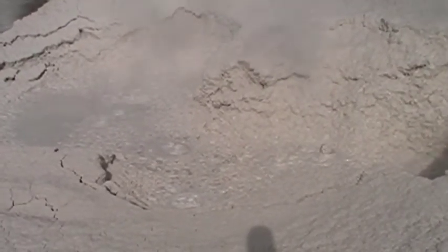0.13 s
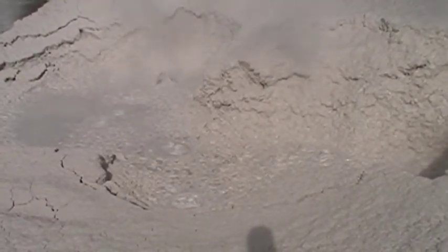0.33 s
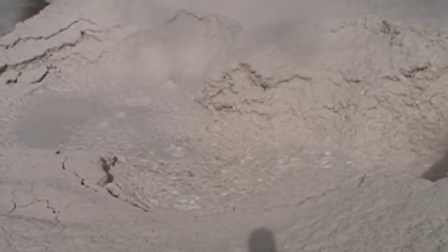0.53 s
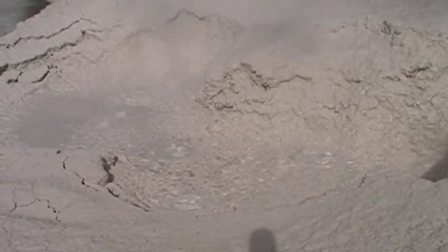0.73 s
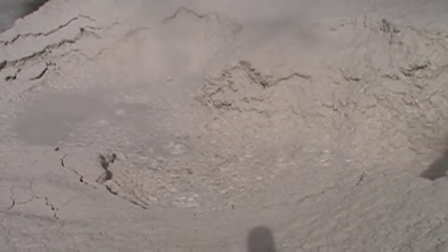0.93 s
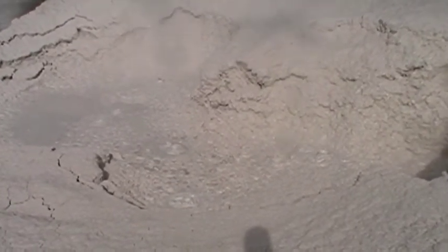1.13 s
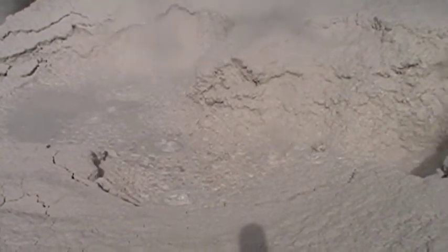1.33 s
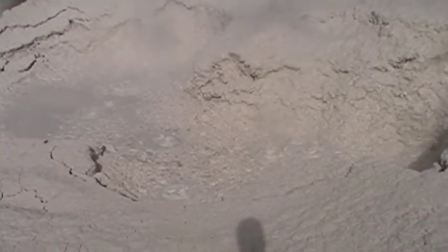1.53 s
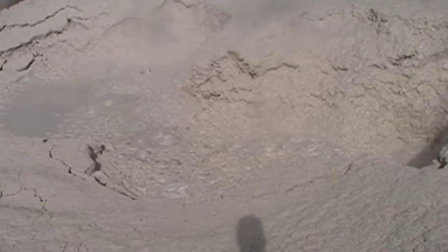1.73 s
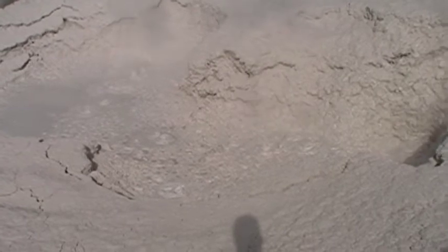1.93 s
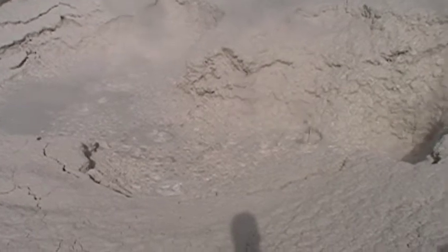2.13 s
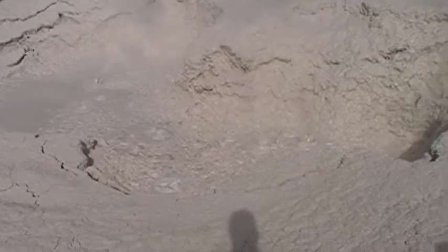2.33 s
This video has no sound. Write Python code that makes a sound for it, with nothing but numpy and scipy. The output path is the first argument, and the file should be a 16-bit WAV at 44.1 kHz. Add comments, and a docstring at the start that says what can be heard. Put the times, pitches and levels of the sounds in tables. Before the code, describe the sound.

Thick mud boils over soft steam hiss and fine wet crackle. Near 0.24 s a loud hollow gulp rises in pitch, followed by a strong pop, snaps, squelch and spatter. Lighter plops come at 0.6 and 0.9-1.3 s, a second deep gulp at 1.5, busier bursts from 1.7, and a hard wet pop at 2.04. Faint high chirps recur; a tiny bird whistle rises near 2.27, under a barely audible steady high tone.

```python
"""Throughout: steam haze (shaped noise), mud simmer (tiny damped rings), a very faint high tone, and from
0.03 s runs of far chirps falling near 6 kHz. At 0.24 s the loudest gulp, a gas pocket ringing with rising pitch,
then a strong pop, film snaps, slap-driven squelches and flung spatter; lighter bursts near 0.6-0.7 and 0.9-1.3 s.
At 1.5 s a second big gulp, more bursts from 1.7 s, a strong pop at 2.04 s; a far bird whistles upward at 2.27 s.
The mud pot boils in a shallow open crater, whose walls answer briefly."""
import sys
import numpy as np
from scipy import signal
from scipy.fft import rfft, irfft, next_fast_len
from scipy.io import wavfile
from scipy.ndimage import map_coordinates

SR = 44100
rng = np.random.default_rng(int(sys.argv[2]) if len(sys.argv) > 2 else 0)


def int16_out(signal):
    """Quantize to a 16-bit WAV file."""
    q = np.round(np.clip(np.atleast_2d(signal).T, -1, 1) * 32767)
    wavfile.write(sys.argv[1], SR, q.astype(np.int16))


N = 108045
EVENT_T_S = np.arange(SR // 5) / SR  # time within one event


def amp(db):
    """Decibels to gain."""
    return 10 ** (np.asarray(db) / 20)


def unit(x):
    """Scale to rms 1."""
    return x / np.sqrt(np.mean(x ** 2) + 1e-20)


def along(points, hz):
    """Interpolate (f/Hz, value) points on a log frequency axis."""
    f, value = np.transpose(points)
    return np.interp(np.log(hz + 1), np.log(f + 1), value)


def filtered(x, response):
    """Zero-phase filter: spectrum times a gain function of frequency."""
    n = x.shape[-1]
    padded = next_fast_len(n + 8192)
    gain = response(np.fft.rfftfreq(padded, 1 / SR))
    return irfft(rfft(x, padded) * gain, padded)[..., :n]


def coloured(x, points):
    """Filter x by a (f/Hz, level/dB) colour."""
    return filtered(x, lambda hz: amp(along(points, hz)))


def wobble(knots_per_s, count=N):
    """Smooth random curve through normally distributed knots."""
    knots = rng.standard_normal(256)
    return map_coordinates(knots, [np.arange(count) * knots_per_s / SR], mode="mirror")


def add(track, start_s, sound):
    """Mix a sound into the track from start_s."""
    i = int(np.clip(round(start_s * SR), 0, N - 1))
    track[i:i + len(sound)] += sound[:N - i]


def swell(peak_s, shape):
    """Envelope reaching 1 at peak_s, then dying away; higher shape = more compact."""
    u = EVENT_T_S / peak_s
    return (u * np.exp(1 - u)) ** shape


def glide(middle_s, hz, slope_hz_per_s, width_s):
    """Sliding sine under a Gaussian envelope; hz is the pitch at the middle."""
    t = np.arange(N) / SR - middle_s
    turns = hz * t + slope_hz_per_s * t * t / 2
    return np.exp(-(t / width_s) ** 2) * np.sin(2 * np.pi * turns)


def droplets(per_s, hz, spread, cycles, uneven_db):
    """Stream of tiny damped rings, random in time, pitch (log-normal), size and sign; rms 1."""
    when, size, sign = rng.random((3, 8000))[:, :int(per_s * N / SR)]
    pitch = hz * np.exp(spread * rng.standard_normal(8000)[:len(when)])
    pitch = np.clip(pitch, 150, 15000)[:, None]
    k = np.arange(400)  # samples in one ring
    turns = pitch * k / SR
    gain = np.sign(sign - .5) * amp(-uneven_db * np.log(np.maximum(size, .02)))
    rings = gain[:, None] * np.sqrt(pitch) * np.sin(2 * np.pi * turns) * np.exp(-turns / cycles)
    index = (when * N).astype(int)[:, None] + k
    return unit(np.bincount(index.ravel(), rings.ravel(), N)[:N])


FLUTTER_KNOTS_PER_S, FLUTTER = 400, 0.093  # FLUTTER: scale of the log pitch wobble, doubled for level


def cavity(hz, peak_s, shape, octaves):
    """Gas cavity rings; pitch rises as the mouth opens (1 octave at most), lip flutters once burst."""
    opened = np.clip(EVENT_T_S / peak_s - 1, 0, 1)
    bend = FLUTTER * opened * wobble(FLUTTER_KNOTS_PER_S, len(EVENT_T_S))
    shake = FLUTTER * opened * wobble(FLUTTER_KNOTS_PER_S, len(EVENT_T_S))
    pitch = hz * 2 ** np.minimum(octaves * EVENT_T_S / peak_s, 1) * np.exp(bend)
    return swell(peak_s, shape) * np.exp(2 * shake) * np.sin(2 * np.pi * np.cumsum(pitch) / SR)


# how hard the whole pool simmers: (t/s, level/dB)
BOIL_LEVEL = [(0, 0), (.1, 3), (.48, -1), (.55, 1.5), (.81, -0.5), (1.029, -8.5), (1.09, 5.5), (1.26, -1),
              (1.46, 3.5), (1.651, -1.5), (1.798, 6.5), (1.861, -6), (1.96, 0.5), (2.2, 3.5), (2.28, -3.5),
              (2.36, 4)]


def boil_db():
    """Boiling level per sample, interpolated in dB."""
    return np.interp(np.arange(N) / SR, *np.transpose(BOIL_LEVEL))


STEAM_DB = -55.5
# steam spectrum: (f/Hz, level/dB)
STEAM_COLOUR = [(25, -15), (107, -20), (260, 0.5), (850, 0.5), (1400, -4), (2700, -2.5), (3600, -12),
                (6200, -6.5), (15500, -28.5)]
# steam stereo width: (f/Hz, side level/dB)
STEAM_WIDTH = [(50, 12), (200, 2.5), (1000, 1), (4000, -5.5), (12000, -2.5)]


def steam():
    """Wide shaped-noise bed of steam and far boiling; level follows the simmer weakly."""
    mid, side = coloured(rng.standard_normal((2, N)), STEAM_COLOUR)
    side = coloured(side, STEAM_WIDTH)
    level_db = STEAM_DB + 0.29 * boil_db() + wobble(45.56)
    return amp(level_db) * unit(np.array([mid + side, mid - side]))


CHIRP_HZ, CHIRP_FALL_HZ_PER_S, CHIRP_WIDTH_S = 6045, 31000, 0.0057
CHIRP_GAP_S, CHIRP_DB = .033, -49.5  # gap is approximate: each run is split evenly
# runs of distant chirps: (first t/s, last t/s)
CHIRP_RUNS = [(0.033, .211), (0.336, .398), (.46, .645), (.855, 1.004), (1.129, 1.164), (1.332, 1.465),
              (1.65, 1.796), (1.938, 1.97), (2.185, 2.222), (2.405, 2.44)]


def chirps():
    """Small far creature: runs of quick falling glides, uneven in level, pitch and timing."""
    runs = [np.linspace(a, b, round((b - a) / CHIRP_GAP_S) + 1) for a, b in CHIRP_RUNS]
    times = np.concatenate(runs)
    out = np.zeros(N)
    for t, (loud_db, high, late) in zip(times, rng.standard_normal((len(times), 3))):
        middle_s = t + late * CHIRP_WIDTH_S / 2
        chirp = glide(middle_s, CHIRP_HZ + 60 * high, -CHIRP_FALL_HZ_PER_S, CHIRP_WIDTH_S)
        out += amp(CHIRP_DB + loud_db) * chirp
    return out


WHISTLE_RISE_HZ_PER_S, WHISTLE_WIDTH_S = 7500, .022
# bird whistles: (middle t/s, f/Hz at the middle, peak level/dB)
WHISTLES = [(2.274, 3490, -60)]


def whistles():
    """Far bird: a short rising glide."""
    out = np.zeros(N)
    for t, hz, db in WHISTLES:
        out += amp(db) * glide(t, hz, WHISTLE_RISE_HZ_PER_S, WHISTLE_WIDTH_S)
    return out


# crater wall decay: (f/Hz, t60/s)
CRATER_T60 = [(250, 0.08), (1000, 0.067), (9000, 0.078)]
# echo stereo width: (f/Hz, side level/dB)
ECHO_WIDTH = [(200, -22), (600, -5.5), (2500, -10), (8000, -1), (13000, 1.5)]


def crater(x):
    """Wall answer: convolution with decaying noise after a 130-sample delay, wider in the treble."""
    hz, t, z = signal.stft(rng.standard_normal((2, SR // 3)), SR, nperseg=256)
    decay = amp(-60 * t / along(CRATER_T60, hz)[:, None])
    tail = signal.istft(z * decay, SR, nperseg=256)[1]
    tail = np.pad(tail / np.linalg.norm(tail[0]), ((0, 0), (130, 0)))
    mid, side = signal.fftconvolve(x[None], tail, axes=1)[:, :N]
    side = coloured(side, ECHO_WIDTH)
    return np.array([mid + side, mid - side])


SIMMER_DB, CRACKLE_DB = -57.5, -60.5
# heavy mud spectrum, for simmer bubbles and splats: (f/Hz, level/dB)
SPLAT_COLOUR = [(100, -22), (250, 5), (490, -10.5), (770, 2), (1300, -5), (2700, 2), (3500, -5.5),
                (6000, 0)]
# fine mud spectrum, for crackle and spray: (f/Hz, level/dB)
SPRAY_COLOUR = [(1500, 5), (3500, -6.5), (4400, -0.5), (10000, 2.5), (12500, -9), (15500, -28)]


def simmer():
    """Countless small bubbles and crackles over the pool, as dense streams of damped rings."""
    bubbles = droplets(per_s=550, hz=855, spread=0.743, cycles=2.0, uneven_db=3.2)
    crackle = droplets(per_s=800, hz=5700, spread=.55, cycles=1.3, uneven_db=4)
    bubbles = unit(coloured(bubbles, SPLAT_COLOUR))
    crackle = unit(coloured(crackle, SPRAY_COLOUR))
    activity_db = boil_db() + 2 * wobble(60)
    return amp(SIMMER_DB + activity_db) * bubbles + amp(CRACKLE_DB + activity_db) * crackle


POP_SHAPE = 0.61  # swell shape of blips and pops
BLIPS_PER_S, BLIP_HZ, BLIP_SPREAD_OCTAVES = 55, 1400, .8
BLIP_CYCLES, BLIP_DB, BLIP_RISE_OCTAVES = 4, -47, 0.0907  # cycles to the peak; rise per swell


def blips():
    """Single small bubbles at random times, each a cavity with its own rising pitch."""
    out, boil = np.zeros(N), boil_db()
    for i in rng.integers(N, size=int(BLIPS_PER_S * N / SR)):
        hz = BLIP_HZ * 2 ** rng.normal(scale=BLIP_SPREAD_OCTAVES)
        gain = amp(BLIP_DB + boil[i]) * rng.random()
        add(out, i / SR, gain * cavity(hz, BLIP_CYCLES / hz, POP_SHAPE, BLIP_RISE_OCTAVES))
    return out


SPATTER_SHAPE = 1.69  # swell shape of spatter and squelches
# showers of flung mud: (t/s, swell/s, splat level/dB, fine spray level/dB)
SPATTERS = [(0.158, 0.008, -50.5, -46.5), (0.244, 0.015, -41.5, -51), (0.263, 0.017, -36.5, -45.5),
            (0.295, 0.0091, -39.5, -48), (0.359, 0.01, -64, -50), (0.411, 0.008, -47.5, -45),
            (0.589, 0.008, -41.5, -42.5), (.658, 0.012, -46, -54), (.921, 0.0042, -43.5, -46),
            (1.139, 0.013, -36, -47), (1.18, 0.008, -39, -46), (1.346, 0.0048, -45.5, -68),
            (1.407, 0.0048, -45, -44), (1.508, 0.0046, -38.5, -42), (1.582, 0.01, -46, -51.5),
            (1.725, 0.0086, -36.5, -56), (1.767, 0.0054, -42, -48), (1.895, 0.0028, -46, -52),
            (1.917, 0.0069, -47.5, -50), (1.974, 0.023, -44.5, -58), (2.035, 0.014, -40.5, -38.5),
            (2.058, 0.0064, -44, -42.5), (2.126, 0.019, -46, -51), (2.19, 0.0034, -37, -66)]


def spatter():
    """Flung mud lands: each shower is a swell of heavy splats and fine spray."""
    splats = droplets(per_s=3000, hz=1010, spread=0.674, cycles=1.8, uneven_db=3.0)
    spray = droplets(per_s=1400, hz=6200, spread=.42, cycles=1.5, uneven_db=3.6)
    splats, spray = coloured(splats, SPLAT_COLOUR), coloured(spray, SPRAY_COLOUR)
    out = np.zeros(N)
    for t, peak_s, splat_db, spray_db in SPATTERS:
        env = swell(peak_s, SPATTER_SHAPE)
        for stream, db in ((splats, splat_db), (spray, spray_db)):
            start = rng.integers(N - len(env))
            shower = env * stream[start:start + len(env)]
            add(out, t, amp(db) * unit(shower) * np.sqrt(np.mean(env ** 2)))
    return out


SQUELCH_RISE_HZ_PER_S, SQUELCH_RING_S, SLAPS_PER_S = 10700, .0016, 430
# wet mouths left open by a bubble: (t/s, first f/Hz, level/dB, swell/s)
SQUELCHES = [(.265, 484, -31, 0.014), (.592, 1890, -37.5, 0.0053), (0.659, 1420, -52, 0.0076),
             (0.685, 2380, -47, 0.0055), (.704, 347, -51.5, 0.018), (1.407, 2480, -42, 0.0044),
             (1.405, 400, -47.5, 0.022), (1.587, 1890, -45, 0.012), (1.728, 490, -39.5, 0.014),
             (1.783, 604, -57, 0.011), (2.038, 1280, -31, 0.0064), (2.14, 4900, -40, 0.0021),
             (2.156, 4370, -46, 0.0031), (2.192, 2730, -49, 0.0075), (2.394, 624, -47, 0.013)]


def squelches():
    """Mud slaps unevenly in an open mouth, whose ring climbs as the hollow fills."""
    out = np.zeros(N)
    for t, hz, db, peak_s in SQUELCHES:
        env = swell(peak_s, SPATTER_SHAPE)
        pitch = hz + SQUELCH_RISE_HZ_PER_S * EVENT_T_S
        turn = np.exp(2j * np.pi * np.cumsum(pitch) / SR)
        slaps = (rng.random(len(env)) < SLAPS_PER_S / SR) * rng.random(len(env))
        # resonator with moving pitch: demodulate, decay, remodulate
        decayed = signal.fftconvolve(slaps / turn, np.exp(-EVENT_T_S / SQUELCH_RING_S))[:len(env)]
        ring = np.imag(turn * decayed)
        add(out, t, amp(db) * unit(env * ring) * np.sqrt(np.mean(env ** 2)))
    return out


SNAP_DECAY_S = 0.0013
# snap spectrum: (f/Hz, level/dB)
SNAP_COLOUR = [(300, -16), (1500, 0), (5000, 3.5), (9000, 1), (12000, -10), (15500, -52)]
# sharp snaps of thin film: (t/s, peak level/dB)
SNAPS = [(0.2467, -30.5), (0.2755, -29), (.2955, -23.5), (0.9297, -27.5), (1.415, -25.5), (1.549, -33),
         (1.727, -35), (1.895, -22.5), (2.039, -25), (2.0815, -30), (2.098, -29), (2.1399, -25),
         (2.175, -27)]


def snaps():
    """Thin films tear: bright ticks of decaying noise."""
    out = np.zeros(N)
    for t, db in SNAPS:
        burst = rng.standard_normal(len(EVENT_T_S)) * np.exp(-EVENT_T_S / SNAP_DECAY_S)
        tick = coloured(burst, SNAP_COLOUR)
        add(out, t, amp(db) * tick / np.abs(tick).max())
    return out


POP_CYCLES, POP_RISE_OCTAVES = 0.68, 0.027  # cycles to the peak; rise per swell
# bubbles bursting: (t/s, f/Hz, peak level/dB)
POPS = [(.105, 1430, -31.5), (0.163, 1610, -37.5), (0.2834, 1960, -38), (.2882, 850, -16.5),
        (0.5985, 1860, -30.5), (0.924, 892, -24.5), (0.9272, 872, -29), (1.1459, 2580, -26.5),
        (1.1827, 1040, -30), (1.2503, 1780, -33.5), (1.3026, 784, -38.5), (1.5102, 1080, -25),
        (1.5485, 2460, -33.5), (1.7, 1680, -32.5), (1.7263, 643, -27.5), (1.7677, 1600, -30.5),
        (1.8951, 2410, -25), (2.0381, 836, -16), (2.127, 860, -34.5), (2.1725, 7400, -35),
        (2.1918, 2420, -23), (2.1909, 950, -31), (2.3214, 845, -29.5)]


def pops():
    """Small cavities burst open and ring for a few cycles."""
    out = np.zeros(N)
    for t, hz, db in POPS:
        add(out, t, amp(db) * cavity(hz, POP_CYCLES / hz, POP_SHAPE, POP_RISE_OCTAVES))
    return out


GULP_SHAPE = 3.7
# gas pockets opening: (t/s, f/Hz, peak level/dB, swell/s, rise/octaves per swell)
GULPS = [(0.103, 265, -37.5, 0.003, 0.044), (0.124, 229, -30.5, 0.005, 0.37),
         (0.236, 217, -12.5, 0.0082, 0.16), (0.26, 301, -22, 0.007, 0.12), (0.38, 376, -38, 0.0028, 0.078),
         (0.668, 276, -32.5, 0.0051, 0.11), (.690, 252, -37, 0.007, 0.1), (0.702, 320, -32.5, 0.0043, .2),
         (0.758, 287, -42.5, 0.0043, 0.11), (1.058, 460, -32, 0.0013, 0.17),
         (1.425, 520, -37, 0.0047, 0.093), (1.499, 166, -23, 0.0055, 0.29),
         (1.5054, 214, -15.5, 0.0069, 0.19), (1.698, 231, -38, 0.0093, 0.14),
         (1.7256, 340, -28.5, 0.0036, 0.18), (1.99, 234, -38, 0.0042, 0.065),
         (2.018, 193, -30.5, 0.007, 0.12), (2.037, 343, -25, 0.0025, 0.08), (2.28, 240, -39.5, 0.01, 0.48)]


def gulps():
    """Large gas pockets push through the mud, each a cavity of rising pitch."""
    out = np.zeros(N)
    for t, hz, db, peak_s, octaves in GULPS:
        add(out, t, amp(db) * cavity(hz, peak_s, GULP_SHAPE, octaves))
    return out


ECHO_DB, LOW_CUT_HZ = -7.5, 150


def scene():
    """Pool, wildlife and wall answer, with little radiated below LOW_CUT_HZ, over steam."""
    near = gulps() * amp([[.5], [-.5]])  # left, right/dB
    rest = pops() + snaps() + squelches() + spatter() + blips() + simmer() + chirps() + whistles()
    echo = crater(rest + amp(-3) * near.mean(axis=0))
    pool = near + rest + amp(ECHO_DB) * echo
    return filtered(pool, lambda hz: hz ** 2 / np.hypot(hz ** 2, LOW_CUT_HZ ** 2)) + steam()


TONE_HZ, TONE_DB, TOP_HZ = 15734, -85, 15900


def record(dry):
    """Add the faint steady high tone; keep nothing above TOP_HZ."""
    tone = amp(TONE_DB) * np.sin(2 * np.pi * TONE_HZ * np.arange(N) / SR)
    return filtered(dry + tone, lambda hz: hz < TOP_HZ)


dry = scene()
out = record(dry)
int16_out(out)
```